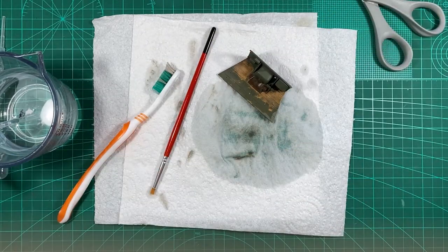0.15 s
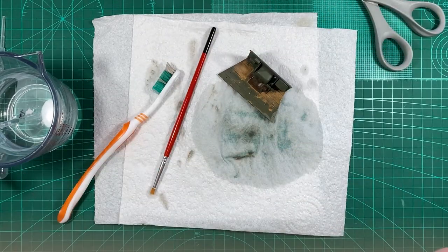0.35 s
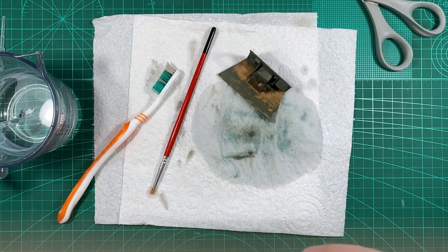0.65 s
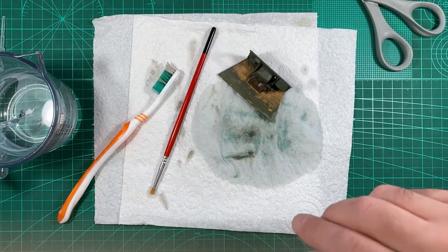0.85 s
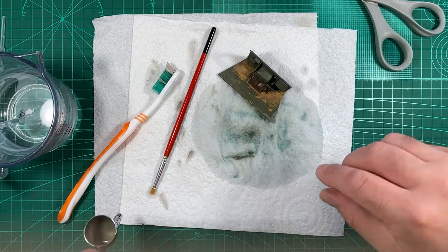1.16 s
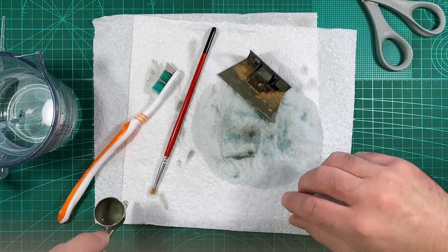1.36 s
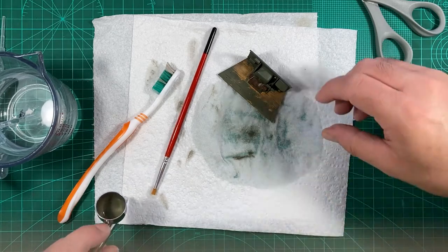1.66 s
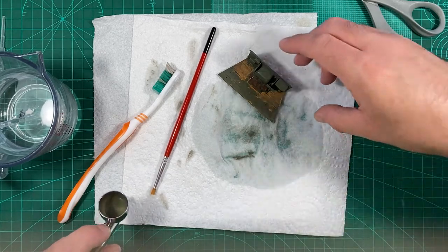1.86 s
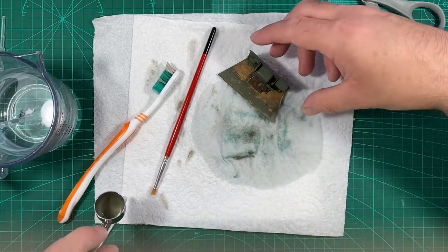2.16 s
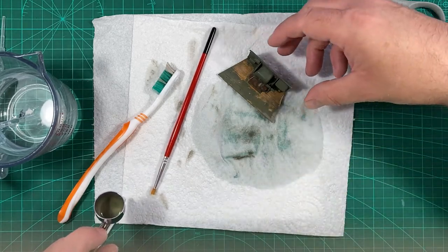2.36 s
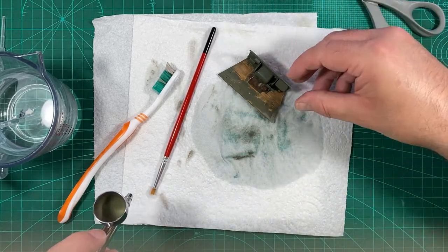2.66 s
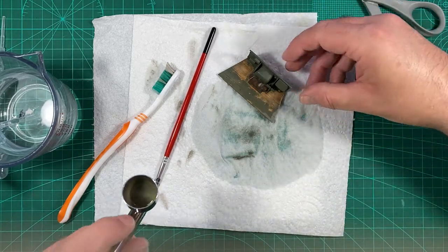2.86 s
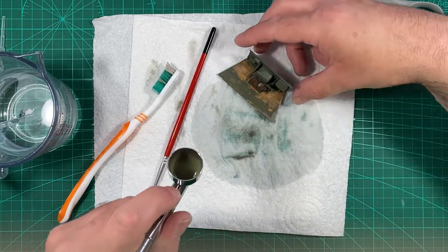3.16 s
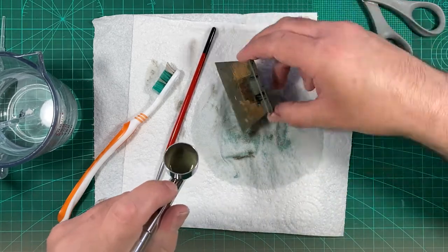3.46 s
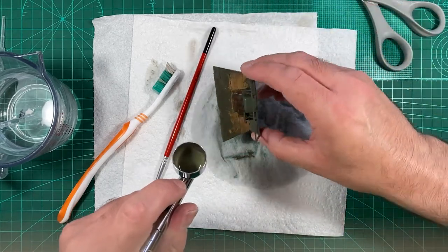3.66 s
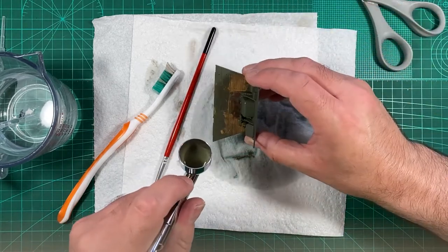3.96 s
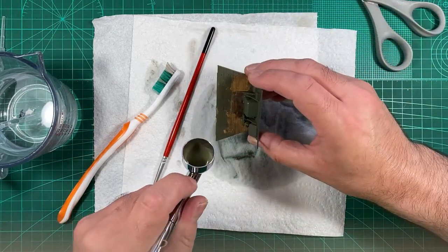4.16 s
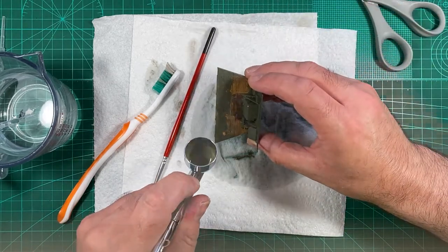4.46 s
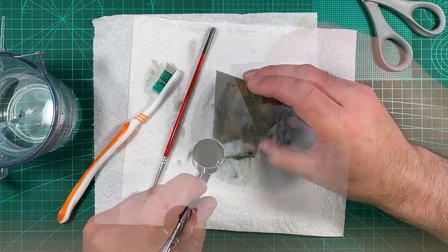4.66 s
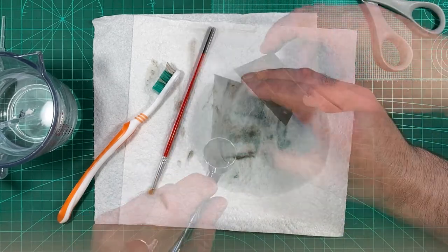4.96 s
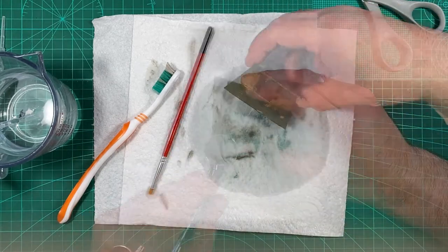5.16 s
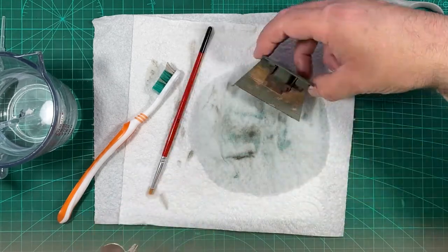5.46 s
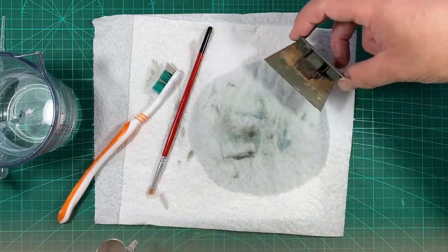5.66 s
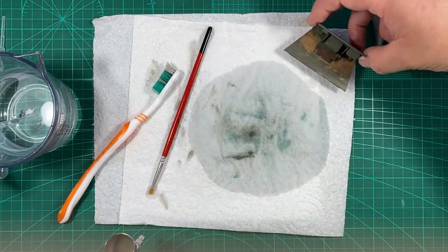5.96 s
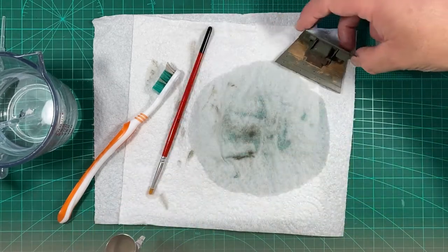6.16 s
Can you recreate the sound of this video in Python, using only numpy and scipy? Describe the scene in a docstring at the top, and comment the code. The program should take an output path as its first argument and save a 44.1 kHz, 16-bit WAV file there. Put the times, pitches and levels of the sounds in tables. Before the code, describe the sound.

A small, quiet room with low rumble and very faint hiss, heard close in stereo over a workbench. At 0.4 s a soft double bump with a light scuff; a fainter touch at 1.0 s. From about 1.4 to 1.7 s an airbrush gives a breathy puff of air, then a brighter, quicker one at 1.9-2.2 s and a short one at 2.3-2.5 s, ending among dull bench bumps. Around 3.2-3.45 s fingers scuff paper and softly knock the bench. At 3.95 s a stronger jet opens, surging at 4.1 s and again at 4.5 s as it rushes over the part with hiss, roar and a faint airy whistle, fading by 4.9 s. Meanwhile a piston compressor fades in, reaching full level at 4.9 s: low hum, fast throbbing chug and muted metallic clatter, steady to the end. At 5.6 s a tiny sharp plastic click with a light scuff.

```python
"""An airbrush blows a small model part dry on a workbench, close to a stereo microphone in a small room.
Its jet is shaped noise: three short test puffs, then a long blast that rushes over the part in two sweeps.
Soft bumps ring bench modes and scuffs are grainy noise, as fingers pick the part off a paper towel.
A piston compressor (shaft and hum lines, cyclic clatter, rumble) is faded in during the blast and chugs on.
The plastic part clicks once, a decaying noise burst; a low ambience runs throughout."""
import sys
import numpy as np
from scipy import signal
from scipy.fft import rfft, irfft
from scipy.io import wavfile

SR = 44100
rng = np.random.default_rng(int(sys.argv[2]) if len(sys.argv) > 2 else 0)


def to_wav(s):
    """Save 16-bit WAV."""
    ch = np.atleast_2d(s).T  # columns
    pcm = np.round(np.clip(ch, -1, 1) * 32767)  # PCM
    wavfile.write(sys.argv[1], SR, pcm.astype(np.int16))


N = 278712
TIME, FREQ = np.arange(N) / SR, np.fft.rfftfreq(N, 1 / SR)
SHAFT_HZ, HUM_HZ = 23.175, 100

# bare nozzle spectrum: freq_hz, relative_db
JET_SPECTRUM = [(60, -22), (140, -5.5), (260, -10), (450, -17.5), (800, -18), (1400, -10.5), (2800, -5.5),
                (4000, -5.5), (5600, 1.5), (7200, 1), (9000, -11), (10400, -13.5), (11800, -8),
                (14000, -1.5), (15500, -0.5)]
# left-right likeness of diffuse sound: freq_hz, correlation
LIKENESS = [(40, 1), (130, .94), (290, .72), (640, .3), (1400, .1), (4500, .1), (5800, .5), (8000, .5),
            (9300, .9), (12300, .5), (13600, .9), (15500, .6)]


def amp(db):
    """Decibels to gain."""
    return 10 ** (np.asarray(db) / 20)


def unit(x):
    """Scales to rms 1."""
    return x / np.sqrt(np.mean(x ** 2) + 1e-20)


def read(points, hz=FREQ):
    """Interpolates a table on a log-frequency axis."""
    f, value = np.transpose(points)
    return np.interp(np.log(hz + 1), np.log(f + 1), value)


def ramp(start_s, length_s):
    """Rises evenly from 0 to 1, then holds."""
    return np.clip((TIME - start_s) / length_s, 0, 1)


def resonance(hz, centre_hz, width_hz):
    """Resonance curve over frequency, 1 at its centre."""
    return 1 / (1 + (2 * (hz - centre_hz) / width_hz) ** 2)


def colour(x, db):
    """Filters by a gain in dB for each frequency."""
    return irfft(rfft(x) * amp(db), N)


def pan(db):
    """Left and right gains for a left-minus-right level."""
    return amp(np.array([np.atleast_1d(db), -np.atleast_1d(db)]) / 2)


def noise(db):
    """Noise of rms 1 with the given spectrum."""
    return unit(colour(rng.standard_normal(N), db))


def drift(hz):
    """Random motion of rms 1, lowpassed near hz."""
    return unit(irfft(rfft(rng.standard_normal(N)) / (1 + (FREQ / hz) ** 4), N))


def diffuse(pair):
    """Mixes two unrelated signals to the likeness of diffuse sound at two close microphones."""
    a, b = rfft(pair)
    alike = np.clip(read(LIKENESS), -1, 1)
    mid = a * np.sqrt((1 + alike) / 2)
    side = b * np.sqrt((1 - alike) / 2)
    return irfft(np.array([mid + side, mid - side]), N)


def room(x):
    """The room's tail: dense reflections whose decay time depends on frequency."""
    # decay time: freq_hz, t60_s
    decay = [(150, 0.47), (1000, 0.86), (3000, 0.5), (6000, 0.56), (10000, 0.45), (15000, 0.23)]
    # tail spectrum: freq_hz, relative_db
    tail_spectrum = [(200, 3), (1500, 1), (4000, 3), (6500, -5), (10000, -9.5), (15000, -3.5)]
    hz, t, z = signal.stft(rng.standard_normal((2, N)), SR, nperseg=256)
    t60_s = read(decay, hz)[:, None]
    decaying = z * amp(-60 * t / t60_s) / np.sqrt(t60_s)
    tail = signal.istft(decaying, SR, nperseg=256)[1][:, :N]
    tail = colour(tail / np.linalg.norm(tail[0]), read(tail_spectrum))
    onset = np.clip(TIME[:SR] / 0.0009, 0, 1) ** 2
    tail = diffuse(tail)[:, :SR] * onset
    return signal.fftconvolve(x[None], tail, axes=1)[:, :N]


def ambience(level_db=-61):
    """Low room rumble and faint microphone hiss as diffuse noise."""
    # background spectrum: freq_hz, relative_db
    spectrum = [(25, -19), (53, -9), (107, -2), (150, -10), (220, -10.5), (330, -19), (640, -23),
                (1200, -32), (3200, -34.5), (4400, -24), (5600, -33), (8500, -43), (15800, -38.5)]
    pair = diffuse(rng.standard_normal((2, N)))
    return amp(level_db) * unit(colour(pair, read(spectrum)))


def bumps(level_db=1, attack_s=0.0068, room_db=-1, blow_hz=216, fall_db_per_octave=7):
    """Soft blows ring decaying bench modes, strongest around blow_hz; hardness tilts them upward."""
    # blows on the bench: start_s, relative_db, hardness_db_per_octave
    blows = [(.399, -40, 6.5), (.424, -39.5, 2), (0.481, -52, -8), (1.023, -53.5, 10.5), (1.316, -45.5, 6),
             (1.368, -46, 1), (2.392, -40.5, -2), (2.422, -40.5, -4), (2.467, -38, -3), (3.369, -44.5, 1.5),
             (3.394, -43, -4.5), (3.445, -53, -8)]
    # bench modes: freq_hz, relative_db, t60_s
    modes = [(66, -6, 0.46), (90, 2, 0.042), (124, 1, 0.074), (188.5, -4, 0.13), (233.4, -2.5, 0.086),
             (284, -5, 0.14), (408, -8, 0.097), (523.5, -3, 0.053), (590, -3.5, 0.043), (620, -12.5, 0.071),
             (778, -12, 0.033)]
    out = np.zeros(N)
    t = TIME[:SR // 2]
    hz, mode_db, t60_s = np.transpose(modes)[:, :, None]
    octaves = np.log2(np.clip(hz, 100, 480) / blow_hz)
    mode_signs = rng.choice([-1, 1], (len(blows), len(modes), 1))
    for (start_s, db, hardness), signs in zip(blows, mode_signs):
        blow_db = db + hardness * octaves - fall_db_per_octave * abs(octaves)
        decay = amp(mode_db + blow_db - 60 * t / t60_s)
        ring = (signs * decay * np.sin(2 * np.pi * hz * t)).sum(axis=0)
        out[round(start_s * SR):][:len(t)] += ring * np.minimum(t / attack_s, 1)
    return amp(level_db) * (out + amp(room_db) * room(out))


def scuffs(grain_db=3, direct_db=-5, room_db=0):
    """Light slides of hand, trigger and paper: grainy noise that starts quickly and eases off."""
    # slides: start_s, length_s, relative_db, centre_hz, width_octaves
    slides = [(0.4, 0.059, -51, 2040, 0.6), (1.019, 0.025, -64.5, 780, 0.31),
              (1.32, 0.073, -63, 6000, 0.12), (1.314, 0.0081, -55.5, 900, 0.35),
              (1.369, 0.018, -43.5, 980, 0.16), (2.38, 0.027, -58, 1500, 0.11), (3.225, 0.1, -58, 4330, 1),
              (3.356, 0.067, -58, 5750, 0.41), (5.599, 0.1, -51, 4200, 0.7)]
    # soft surfaces dull every slide: freq_hz, gain_db
    paper = [(300, 10), (1000, 1.5), (7300, -0.5), (9000, -24), (15000, -6)]
    out = np.zeros(N)
    for start_s, length_s, db, centre_hz, width in slides:
        stroke = np.interp(TIME, [start_s, start_s + 0.095 * length_s, start_s + length_s], [0, 1, 0])
        offset = np.log2((FREQ + 1) / centre_hz) / width
        band_db = -20 * np.log10(1 + .5 * offset ** 2)
        out += amp(db) * stroke * noise(band_db + read(paper))
    out *= amp(grain_db * drift(200))
    return amp(direct_db) * out + amp(room_db) * room(out)


def puffs(shutting_s=0.025):
    """The trigger opens the valve for a moment; each puff has its own level, opening time and brightness."""
    # test puffs into free air: opens_s, shuts_s, level_db, opening_s, tilt_db_per_octave
    valve_moves = [(1.37, 1.713, -29, 0.036, 1.25), (1.941, 2.215, -26.5, 0.015, 3),
                   (2.329, 2.489, -26.5, 0.0093, 2.66)]
    out = np.zeros(N)
    octaves = np.log2(np.maximum(FREQ, 1500) / 6000)
    for opens_s, shuts_s, db, opening_s, tilt in valve_moves:
        closing = np.clip((shuts_s - TIME) / shutting_s + .5, 0, 1)
        valve = ramp(opens_s, opening_s) * closing
        out += amp(db) * valve * noise(read(JET_SPECTRUM) + tilt * octaves)
    return out


def blast(hiss_db=8, rush_db=0.5, roar_db=2, graze_db=-2, whistle_db=0.5, whistle_flutter_db=2, flutter_db=0.67):
    """Turbulence at the part's edges and hollows joins the nozzle hiss, peaking as each sweep comes closest."""
    # air let through by the trigger: time_s, relative_db
    trigger = [(3.95, -63.5), (4.078, -41.5), (4.136, -35), (4.346, -44), (4.402, -44), (4.536, -33),
               (4.638, -44.5), (4.86, -55), (4.92, -79)]
    # jet across the part: closest_s, edges_db, hollows_db, approach_db_per_s, retreat_db_per_s
    sweeps = [(4.132, -21.5, -22.5, 44, 97), (4.519, -27.5, -34, 39, 128)]
    # rush over the edges: freq_hz, relative_db
    rush_spectrum = [(2000, -35), (3700, -17), (4300, 4), (4900, 2.5), (5800, 14), (6400, 11.5),
                     (7100, 8.5), (7800, 5), (9000, -31), (10500, -6)]
    # roar in the hollows: freq_hz, relative_db
    roar_spectrum = [(200, -37), (650, -24), (1100, -9), (1700, -1.5), (2300, 3.5), (2900, 6), (3450, 4),
                     (3750, -1.5), (4200, 0.5), (5200, 1), (8000, -28)]
    # faint whistle of the grazing jet: freq_hz, width_hz, relative_db
    whistle_modes = [(3420, 160, -7), (4130, 73, -2), (5860, 210, 2.5), (6300, 170, -16)]
    opens_s, shuts_s, travel_s = 3.937, 4.93, .024
    enters_s, entering_s = 4.099, .032  # the part moves into the jet

    flow = amp(np.interp(TIME, *np.transpose(trigger)))
    valve = ramp(opens_s, travel_s) * (1 - ramp(shuts_s - travel_s, travel_s))
    rush, roar = amp(graze_db) * flow, np.zeros(N)
    for closest_s, edges_db, hollows_db, approach, retreat in sweeps:
        away_db = np.maximum(approach * (closest_s - TIME), retreat * (TIME - closest_s))
        rush = np.hypot(rush, amp(edges_db - away_db))
        roar = np.hypot(roar, amp(hollows_db - away_db))

    whistle_gain = sum(amp(db) * resonance(FREQ, hz, width) for hz, width, db in whistle_modes)
    whistle = noise(20 * np.log10(whistle_gain))
    part = amp(rush_db) * rush * noise(read(rush_spectrum))
    part += amp(roar_db) * roar * noise(read(roar_spectrum))
    part += amp(whistle_db + whistle_flutter_db * drift(25)) * flow * whistle
    hiss = amp(hiss_db) * flow * noise(read(JET_SPECTRUM))
    air = hiss + ramp(enters_s, entering_s) * part
    return valve * air * amp(flutter_db * drift(67))


def airbrush(room_db=-1):
    """The jet sounds a little to the left and fills the room."""
    # jet at the two microphones: freq_hz, left_minus_right_db
    balance = [(200, -1), (1000, 3), (3000, 3.5), (4400, 14), (5500, 5.5), (6800, -0.5), (15000, 1)]
    air = puffs() + blast()
    pair = air + amp(room_db) * room(air)
    return irfft(rfft(pair) * pan(read(balance)), N)


def drone_lines(harmonic_db=-43.5, fall_db_per_octave=-3, sideband_db=-56):
    """Weak shaft harmonics and sidebands of the hum and its octave; the listed lines replace or join them."""
    # strong lines: shaft_multiple, hum_multiple (frequencies add), level_db, left_minus_right_db
    strong = [(2, 0, -42, 1), (5, 0, -40, -3), (10, 0, -51, 6), (11, 0, -49, -2), (12, 0, -48, 5),
              (19, 0, -49, -9), (20, 0, -52, 14), (28, 0, -55, 4), (29, 0, -57, 0), (0, 1, -37, -2),
              (1, 1, -47, -4), (2, 1, -45, 0), (3, 1, -40, 3)]
    lines = {(order, 0): (harmonic_db + fall_db_per_octave * np.log2(order), 0) for order in range(2, 16)}
    lines.update({(order, hum): (sideband_db, 0) for hum in (1, 2) for order in range(-2, 4)})
    lines.update({(order, hum): (db, side_db) for order, hum, db, side_db in strong})
    return [place + level for place, level in lines.items()]


def drone(turns, waver_db=0.116):
    """Shaft harmonics, and their sidebands around the motor's hum, beat into a throb."""
    out, lines = np.zeros((2, N)), drone_lines()
    chances = rng.standard_normal((len(lines), 2))
    for (order, hum, db, side_db), chance in zip(lines, chances):
        line_hz = order * SHAFT_HZ + hum * HUM_HZ
        # the phase gap between the ears follows the likeness
        apart = np.arccos(np.clip(read(LIKENESS, line_hz), -1, 1))
        ear_phase = np.sign(chance[1]) * apart * np.array([[.5], [-.5]])
        phase = 2 * np.pi * (order * turns + hum * HUM_HZ * TIME) + chance[0]
        size = amp(db + waver_db * order * drift(12.0))  # high harmonics waver most
        out += size * pan(side_db) * np.sqrt(2) * np.cos(phase + ear_phase)
    return out


def clatter(turns, level_db=-36, stroke=0.014, valves=0.13, buzz=.16, rattle_hz=750, play_turns=.0022):
    """The same rattle returns at every turn, shaken by the hum and mixed with fresh valve noise."""
    # piston and valve clatter: freq_hz, relative_db
    casing = [(100, -28), (200, -18), (280, -9.5), (400, -6.5), (500, -14.5), (600, -23.5), (800, -15.5),
              (1050, -18), (1260, -13), (1700, -15.5), (2300, -26.5), (3200, -31), (5500, -31.5),
              (7700, -44), (11000, -67)]
    # pump head resonances: freq_hz, width_hz, lift_db
    head = [(396, 39, -4.5), (696, 73, 1.5), (970, 106, 4.5), (1042, 60, -9), (1144, 47, 6), (1226, 40, 9),
            (1390, 47, 6), (1564, 104, 9.5), (1600, 40, -11.5), (1777, 100, 1.5)]
    size = round(SR / SHAFT_HZ)
    place = turns + play_turns * drift(17)  # bearing play: strokes come a little early or late
    cycle = rng.standard_normal((2, size))[:, (place * size).astype(int) % size]
    rattle = colour(cycle, read([(rattle_hz / 2, -25), (rattle_hz, 0)]))  # small parts: little bass
    shake = buzz * cycle * np.cos(2 * np.pi * HUM_HZ * TIME)  # motor torque pulses with the hum
    angle = 2 * np.pi * turns
    load = 1 + stroke * np.cos(2 * angle) + valves * np.cos(3 * angle)
    head_db = sum(db * resonance(FREQ, hz, width) for hz, width, db in head)
    drive = diffuse(load * (rattle + shake + rng.standard_normal((2, N))))
    return amp(level_db) * unit(colour(drive, read(casing) + head_db))


def compressor(wander=.0012, rumble_db=-46):
    """A piston pump on an induction motor, its speed nearly constant, is faded in with its rumble, then stays level."""
    fade_starts_s, fade_lasts_s, fade_curve = 3.943, 0.98, 1.01
    turns = np.cumsum(SHAFT_HZ * (1 + wander * drift(3))) / SR
    rumble_spectrum = [(20, -25), (55, -2), (130, -2.5), (300, -19), (600, -8.5), (2000, -86)]
    rumble = unit(colour(diffuse(rng.standard_normal((2, N))), read(rumble_spectrum)))
    machine = drone(turns) + clatter(turns) + amp(rumble_db) * rumble
    return machine * ramp(fade_starts_s, fade_lasts_s) ** fade_curve


def click(start_s=5.5992, level_db=-27.5, decay_s=0.0021, room_db=0):
    """A fingernail snaps off the plastic edge: a decaying noise burst that differs between the two sides."""
    # thin plastic: freq_hz, relative_db
    plastic = [(800, -18), (2000, -2), (4000, -3), (6200, 0), (7500, -5), (9000, -22), (12500, -20),
               (15500, -20)]
    age_s = np.maximum(TIME - start_s, 0)
    crack = diffuse(np.array([noise(read(plastic)), noise(read(plastic))]))
    snap = amp(level_db) * crack * (age_s > 0) * np.exp(-age_s / decay_s)
    return snap + amp(room_db) * room(snap[0])


def scene():
    """All sources at the microphone pair."""
    return airbrush() + compressor() + bumps() + scuffs() + click() + ambience()


def record(dry, edge_hz=15900):
    """The recorder's stereo processing turns the treble out of step between left and right; then the band
    limit."""
    # recorder's stereo phase: freq_hz, left_lead_rad
    lead = [(100, 0), (1100, .3), (2500, 2.6), (4000, 3.4), (5200, 3.0), (6200, 1.2), (7200, -.1),
            (8000, -1.6), (9300, -3.14), (11400, -6.1), (13600, -9.42), (15600, -12.4)]
    turn = np.exp(1j * np.outer([1, -1], read(lead)) / 2)
    pair = irfft(rfft(dry) * turn, N)
    lowpass = signal.firwin(511, edge_hz, window=("kaiser", 9), fs=SR)
    return signal.oaconvolve(pair, lowpass[None], "same")


dry = scene()
out = record(dry)
to_wav(out)
```